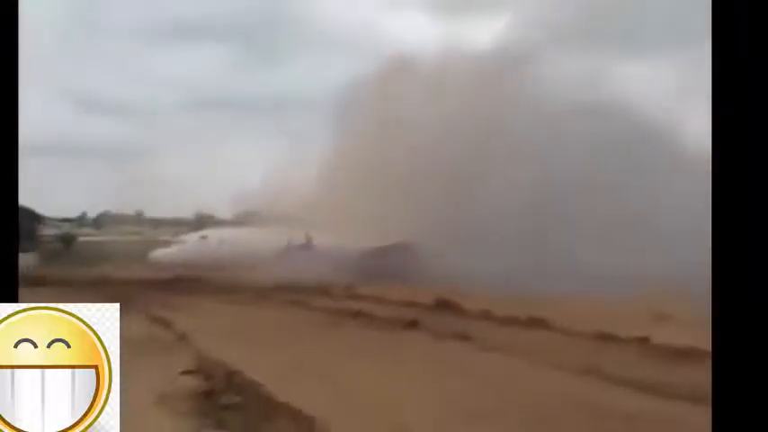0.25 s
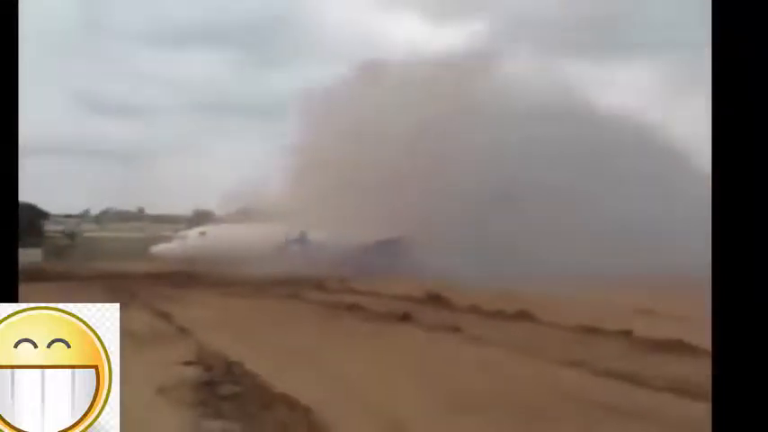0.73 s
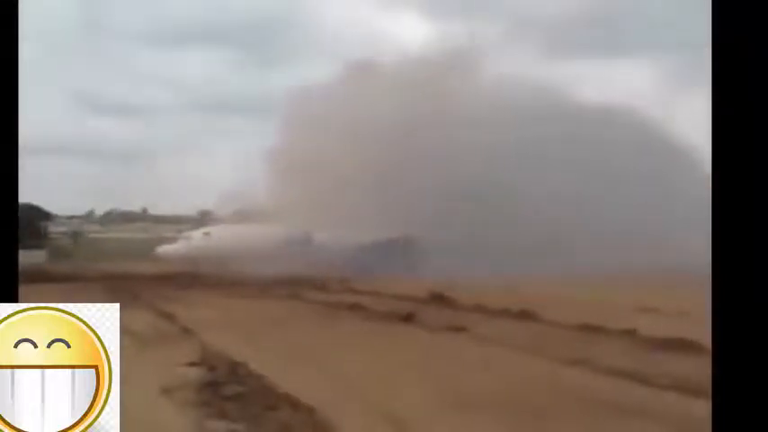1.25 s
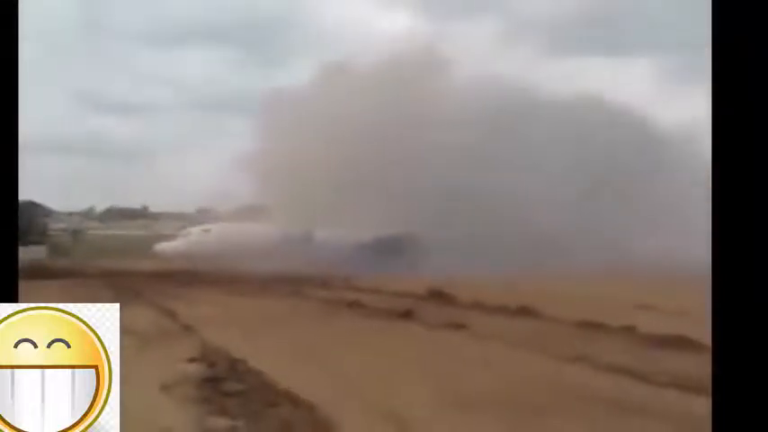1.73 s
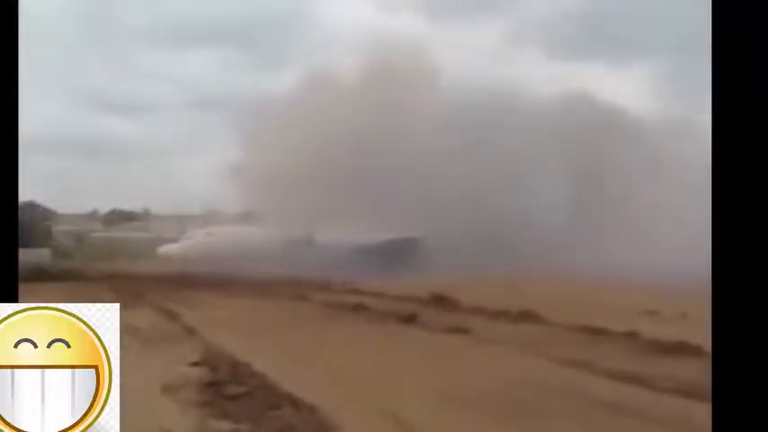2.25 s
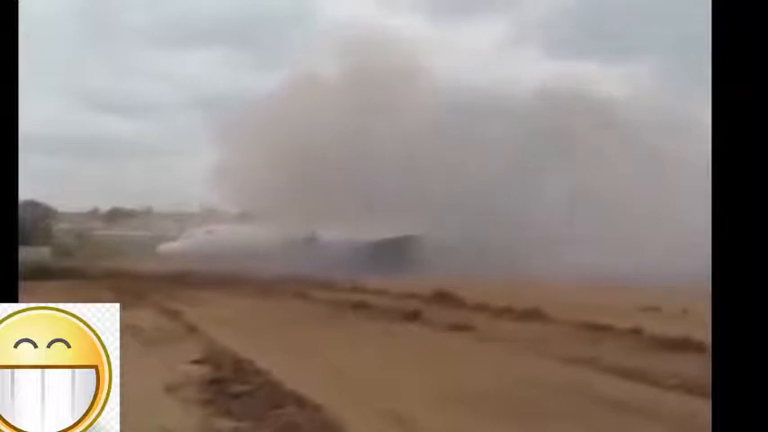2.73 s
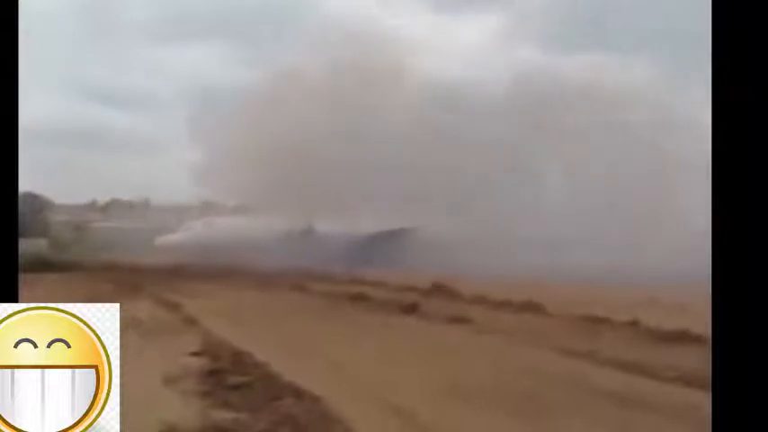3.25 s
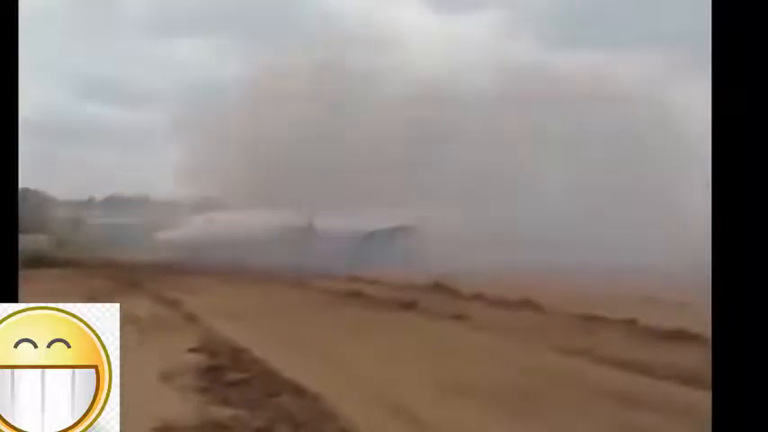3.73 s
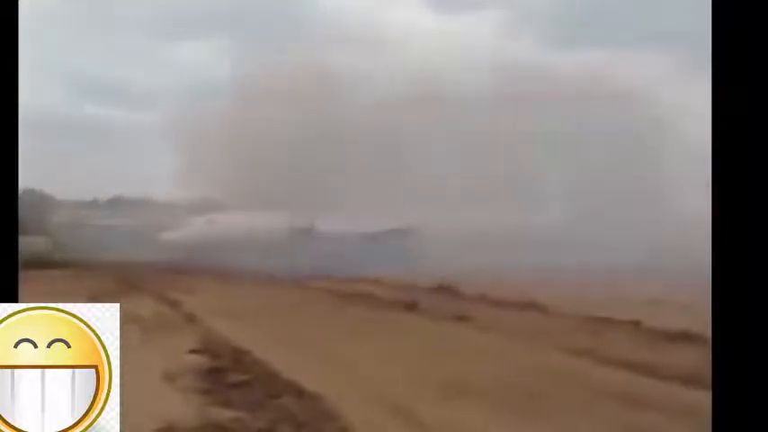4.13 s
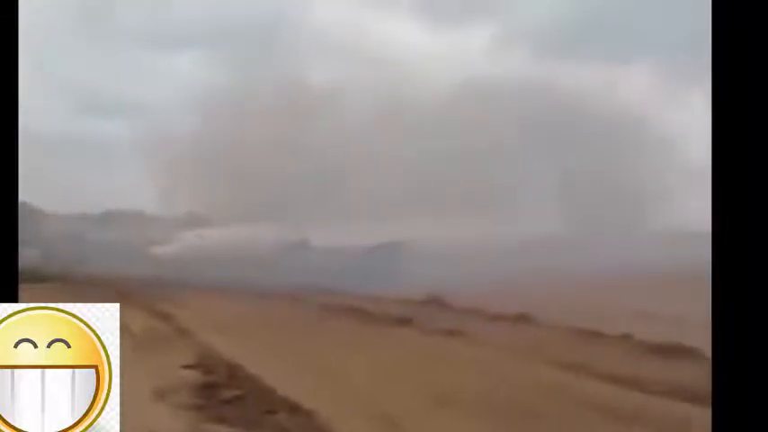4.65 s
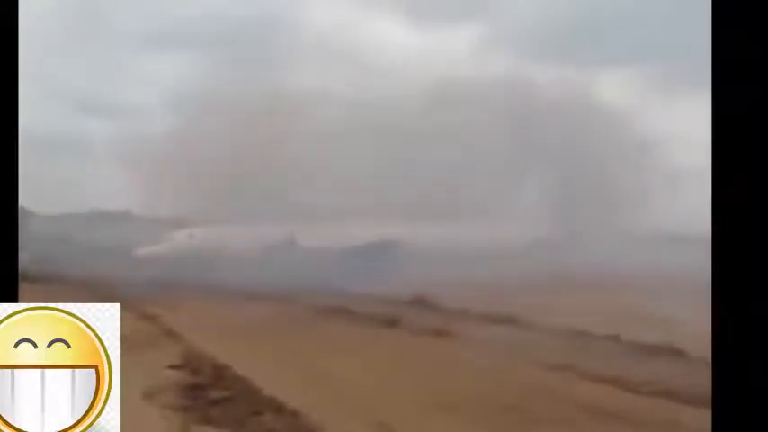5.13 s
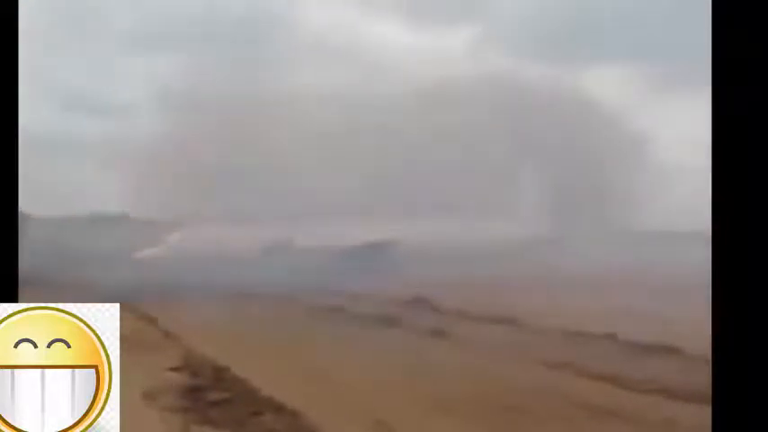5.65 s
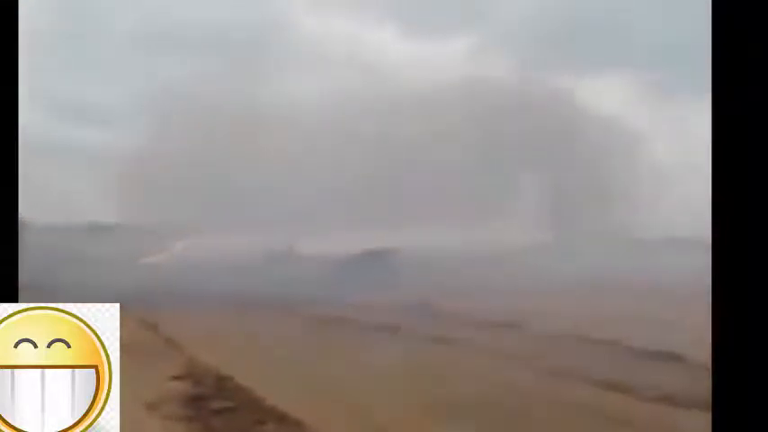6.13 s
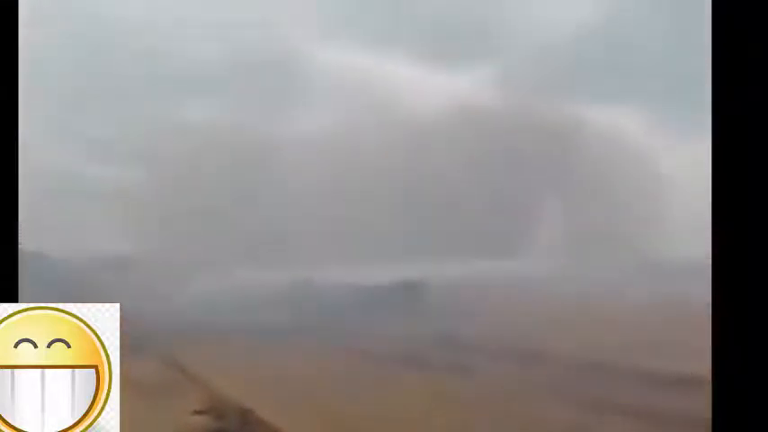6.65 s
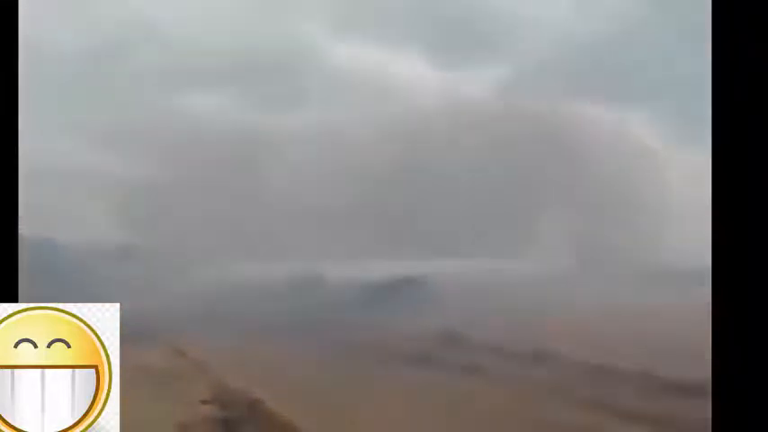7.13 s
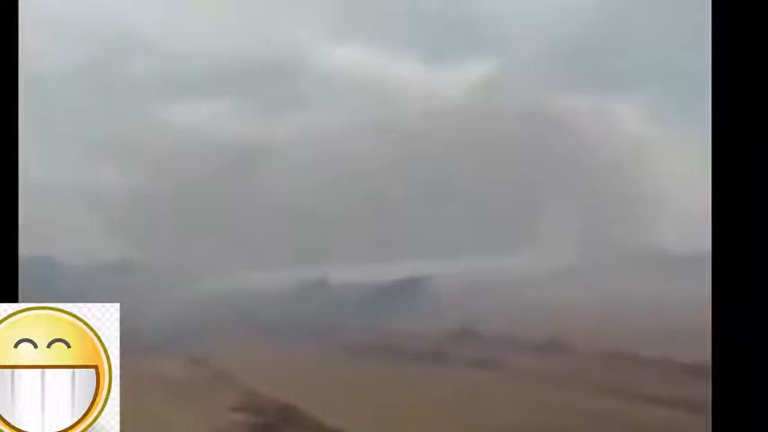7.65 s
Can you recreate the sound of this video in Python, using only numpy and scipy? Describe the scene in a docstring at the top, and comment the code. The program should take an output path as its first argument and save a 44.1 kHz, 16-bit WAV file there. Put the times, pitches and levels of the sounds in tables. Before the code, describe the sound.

Outdoors in an open dirt field, a jet airliner some way off winds its engines down. A broad, grainy rush runs throughout, swelling and dipping with the air, hissy at first and darker later. Thin, breathy turbine whines slide downward, while a low throbbing drone sinks and fades. Wind buffets the handheld microphone softly, most near the end.

```python
"""A jet airliner stands far off in an open field and its engines spool down.
Its broad rush is grainy noise in many bands, darker as the core slows; stirred air makes the upper rush swell.
Blade rows of the core whine in falling tones, with noise scattered around them.
Two unbalanced fan shafts drone low as sines that drift in and out of step, beside a slower shaft.
Wind buffets the microphone ports as low, uneven noise."""
import sys
import numpy as np
from scipy import signal
from scipy.fft import rfft, irfft, next_fast_len
from scipy.io import wavfile
from scipy.ndimage import uniform_filter1d

SR = 44100
rng = np.random.default_rng(int(sys.argv[2]) if len(sys.argv) > 2 else 0)


def materialize(psi):
    """Save the field psi as 16-bit PCM at rate SR to the path in sys.argv[1].

    A 1-D psi becomes a single channel; in a 2-D psi each row is a channel.
    """
    bounded = np.clip(np.atleast_2d(psi).T, -1, 1)
    quanta = np.round(bounded * 32767).astype(np.int16)
    wavfile.write(sys.argv[1], SR, quanta)


N = 347949


def undb(db):
    """Decibels to gain."""
    return 10 ** (np.asarray(db) / 20)


def curves(table):
    """Columns of a table after its time column, drawn as straight lines with one value per sample."""
    s, *columns = np.transpose(table)
    return [np.interp(np.arange(N) / SR, s, column) for column in columns]


def at(table, hz):
    """A table's value at a frequency, read on a log-frequency axis."""
    table_hz, values = np.array(table).T
    return np.interp(np.log(hz), np.log(table_hz), values)


def bump(x, middle, width):
    """A smooth hump of height 1 that has dropped to 0.37 half a width from its middle."""
    return np.exp(-(2 * (x - middle) / width) ** 2)


def walk(rate):
    """A smooth random wander: levels held 1 / rate s and averaged twice over that time; spread 1."""
    hold = int(SR / rate)
    steps = np.repeat(rng.standard_normal(N // hold + 1), hold)
    wander = uniform_filter1d(uniform_filter1d(steps, hold), hold)[:N]
    return wander / wander.std()


def spread(mid, side, pan_db=0):
    """Mid and side to left and right; pan_db raises left over right."""
    return np.array([(mid + side) * undb(pan_db / 2), (mid - side) * undb(-pan_db / 2)])


def core_hz():
    """The core coasts down: its tone falls quickly at first, then ever more slowly towards rest."""
    start_hz, rest_hz, coast_s = 3952, 1189, 5.462
    return rest_hz + (start_hz - rest_hz) * np.exp(-np.arange(N) / SR / coast_s)


def grainy(sound):
    """Random narrow patches of the spectrum swell and fade quickly, giving the rush a grainy texture."""
    patch_db, patch_hz, patch_s = 2.6, 90, .07  # depth; widths of the averaging in frequency and time
    hz, s, frames = signal.stft(sound, SR, nperseg=1024)
    field = rng.standard_normal(frames.shape[1:])  # one field for both ports
    field = uniform_filter1d(field, round(patch_hz / hz[1]), axis=0)
    field = uniform_filter1d(field, round(patch_s / s[1]), axis=1)
    depth_db = patch_db * np.clip(hz / 1500, 0, 1)[:, None]  # shallower below 1500 Hz
    return signal.istft(frames * undb(depth_db * field / field.std()), SR)[1][:, :N]


def rush(levels, pan_db):
    """Broad jet noise in overlapping bands a fifth of an octave apart; its colour darkens as the core slows."""
    # where each rush level applies: f/Hz
    rush_hz = [700, 2200, 3400, 4900, 7800]
    # colour of the rush while the core is fast: f/Hz, density/dB
    fast = [(25, -11), (100, -4.5), (170, -4.5), (280, -5.5), (480, -6.5), (800, -5.5), (1500, -9),
            (2700, -12.5), (3400, -7), (4500, -5.5), (6000, -12.5), (8000, -11.5), (9500, -12.5),
            (10800, -24)]
    # colour of the rush when the core is slow: f/Hz, density/dB
    idle = [(25, -1), (100, 2.5), (170, 4.5), (280, -3), (480, -4), (800, 2), (1500, -1), (2700, -2.5),
            (3400, -6), (4500, -14.5), (6000, -17), (8000, -14.5), (9500, -23), (10800, -49.5)]
    # steady dips and humps of the sound path and the microphone: f/Hz, width/Hz, gain/dB
    path = [(520, 160, -4), (1120, 170, -8), (1850, 250, -2.5), (2600, 600, 1.5), (3400, 750, 2.5)]
    # how wide the rush sounds: f/Hz, side minus mid/dB
    side_db = [(40, -21), (90, -24), (190, -21), (340, -22), (600, -24), (1060, -12), (1880, -11.5),
               (2600, -8), (3400, -11), (4400, -10), (5950, -6), (8000, -7.5), (10600, -16)]
    # how much of the left-right lean each pitch gets: f/Hz, share/1
    pan_share = [(1800, 0), (2600, 0.17), (3400, 1.3), (4000, -0.46), (5500, 0)]
    rumble_db = -32  # steady exhaust rumble below the roar
    # flicker from eddies: shared by all bands, each band's own, extra of its own in the treble
    shimmer_db, grain_db, high_grain_db = 1.2, 1.0, .1

    size = next_fast_len(N)
    noise_hz = np.arange(1, size // 2 + 2) * SR / size
    octave = np.log2(noise_hz)
    path_db = sum(db * bump(noise_hz, hz, width) for hz, width, db in path)
    spectra = rfft(rng.standard_normal((2, size))) * undb(path_db)

    slowed = np.clip((3500 - core_hz()) / (3500 - 1950), -.3, 1.1)  # 0 is fast, 1 is slow

    def colour(hz):
        return (1 - slowed) * at(fast, hz) + slowed * at(idle, hz)

    anchors = [150] + rush_hz
    # each level covers a stretch this many Hz wide, so the width comes off it to give a density
    widths_db = 10 * np.log10([200, 1200, 1400, 1100, 2000, 4500])
    lift = [db - width_db - colour(hz) for db, width_db, hz in zip([rumble_db] + levels, widths_db, anchors)]

    out, shimmer = 0, walk(17)
    for centre in np.arange(4.5, 13.6, .2):
        hz = 2 ** centre
        window = np.cos(np.pi / 2 * np.clip((octave - centre) * 5, -1, 1)) ** 2
        mid, side = irfft(spectra * window, size)[:, :N] * np.sqrt(SR / 2)  # to density per Hz
        # blend the lifts of the two nearest anchors
        shares = [np.interp(np.log(hz), np.log(anchors), one) for one in np.eye(len(anchors))]
        db = colour(hz) + sum(share * one for share, one in zip(shares, lift) if share)
        high = min(hz / 7900.0, 1)  # short waves feel the eddies most
        db = db + high * shimmer_db * shimmer + (grain_db + high_grain_db * high) * walk(16)
        out = out + undb(db) * spread(mid, undb(at(side_db, hz)) * side, pan_db * at(pan_share, hz))
    return grainy(out)


def tone(hz, db, flutter_db, smear):
    """A sine whose level and phase waver as the air along the path stirs."""
    phase = 2 * np.pi * np.cumsum(hz) / SR
    gain = np.sqrt(2) * undb(db + flutter_db * walk(16))
    return gain * np.sin(phase + smear * walk(25))


def band(hz, width_hz):
    """Noise in a band whose centre moves: slow noise shifted up to the moving pitch; rms 1."""
    low_pass = signal.butter(2, width_hz / 2, fs=SR, output="sos")
    slow = signal.sosfilt(low_pass, rng.standard_normal((2, N)))
    carrier = np.exp(2j * np.pi * np.cumsum(hz) / SR)
    noise = np.real(carrier * (slow[0] + 1j * slow[1]))
    return noise / noise.std()


def whine(pan_db):
    """Blade-passing and nearby tones of the core, each in a skirt scattered by turbulence; the turbine band."""
    # pitch of each blade row or sound beside it: name, multiple of the core tone/1
    row_multiples = {"first": .997, "second": 1.2375, "third": 1.5381, "fourth": 1.7975, "under first":
                     .955, "under second": 1.2155, "over second": 1.325, "low": .406, "high": 2.1,
                     "turbine": 3.29}
    # moments when a whistle or short hissing surge stands out of the rush: pitch name, middle t/s, length/s,
    # level/dB
    whistles = [("first", 0.09, 0.24, -33), ("second", 0.16, .4, -32.5), ("first", 0.69, 0.24, -34.5),
                ("second", 0.8, 0.3, -43), ("first", 1.33, 0.12, -36), ("under first", 1.4, .16, -36),
                ("first", 1.56, 0.3, -33.5), ("first", 1.82, .16, -35), ("over second", 2.14, .12, -34),
                ("second", 2.2, 0.12, -39), ("second", 2.62, 0.2, -39), ("first", 3.3, 0.3, -42),
                ("under second", 3.57, 0.3, -33.5), ("second", 4.35, .25, -40), ("low", 7.84, .16, -40),
                ("high", .15, .3, -39), ("turbine", 5.65, .2, -38), ("fourth", 5.65, .4, -43),
                ("third", 6.05, 0.3, -41), ("second", 6.55, 0.3, -41), ("third", 6.5, .3, -40),
                ("first", 6.5, 0.6, -42), ("fourth", 6.6, .15, -44), ("fourth", 7.0, 0.3, -37),
                ("fourth", 7.38, .3, -38), ("fourth", 7.75, 0.3, -39)]
    # broad humps of scattered sound around the first two rows: t/s, first level/dB, second level/dB
    humps = [(0, -42, -44), (.4, -37, -43), (.8, -33, -34), (1.2, -38, -45), (1.6, -39, -46),
             (2.1, -37, -33), (2.6, -35, -36), (2.85, -35, -39), (3.2, -33, -37), (3.4, -37, -34),
             (3.65, -31, -34), (3.9, -34, -38), (4.3, -42, -33), (4.55, -36, -39), (4.85, -41, -36),
             (5.4, -41, -37), (7.89, -43, -39)]
    # a high turbine tone scattered into a band: t/s, multiple of the core tone/1, level/dB
    turbine = [(0, 2.2, -37), (1, 2.3, -37), (2.5, 2.9, -90), (4, 3.25, -38), (4.5, 3.25, -41.5),
               (4.9, 3.25, -38), (5.25, 3.25, -39), (5.65, 3.27, -34), (6, 3.25, -38), (6.4, 3.25, -38.5),
               (7.89, 3.25, -42)]
    buried_db = -52  # level at each pitch between these moments
    flutter_db, smear, skirt_db, skirt_hz = 2.5, .5, -9, 120  # smear in radians; skirt relative to its tone

    hz, t = core_hz(), np.arange(N) / SR
    tones = 0
    for name, row in row_multiples.items():
        swells = sum(undb(db) * bump(t, s, length) for r, s, length, db in whistles if r == name)
        gain = undb(buried_db) + swells
        skirt = undb(skirt_db) * band(hz * row, skirt_hz)
        tones = tones + gain * (tone(hz * row, 0, flutter_db, smear) + skirt)
    for row, db in zip((1.0, 1.29), curves(humps)):  # hump centres over the core tone
        tones = tones + undb(db) * band(hz * row, 550)
    multiple, db = curves(turbine)
    turbine_mid = band(hz * multiple, 1130)
    turbine_side = undb(-11) * band(hz * multiple, 840)
    return spread(tones, 0, pan_db) + undb(db) * spread(turbine_mid, turbine_side)


def shafts():
    """Once-a-turn drone of the unbalanced shafts; the two fans throb as they fall in and out of step."""
    # two fan shafts: t/s, mean turns f/Hz, level in step/dB, second minus first fan/dB, second harmonic level/dB
    fan = [(0.0, 85.5, -15.5, -10, -29.5), (.39, 81.3, -22, -7, -33.5), (.65, 77.7, -24, -6, -39),
           (1.12, 70.1, -22, -9, -36), (1.6, 64.4, -24, -7, -38), (1.9, 61.1, -25, 0, -37),
           (2.2, 58.3, -26, 2, -38), (2.54, 55.54, -26, 3, -45), (2.94, 52.7, -30.5, 0, -43),
           (3.24, 50.7, -27, -3, -46), (3.79, 47, -33.5, -6, -48), (4.22, 44.7, -29.5, -4, -48),
           (4.58, 43.2, -31.5, -3, -50), (4.9, 42, -32.5, -2, -53), (5.3, 40.3, -36.5, -1, -50),
           (5.89, 38.9, -33.5, -1, -50), (6.27, 36.8, -36.5, -2, -50), (6.63, 34.9, -34, -2, -50),
           (6.98, 33.57, -36.5, -1, -50), (7.35, 33, -41, 0, -50), (7.68, 32.6, -36.5, -1, -51),
           (7.89, 32.3, -39, -1, -51)]
    # turns that the second fan has gained on the first, opposed at each half turn: t/s, lead/turns
    lead_table = [(0, -.2), (.39, .5), (.88, 1.5), (1.5, 2.5), (1.9, 3.5), (2.26, 4.5), (2.74, 5.5),
                  (3.08, 6.5), (4.01, 8.5), (4.76, 10.5), (6.07, 14.5), (6.8, 16.5), (7.2, 17.5),
                  (7.49, 18.5), (7.89, 19.7)]
    # a slower shaft, heard early: t/s, turns f/Hz, level/dB
    slow_shaft = [(0, 54.9, -37), (.6, 52.3, -36), (1.3, 48.04, -40), (1.8, 45.13, -60), (2.4, 42, -62)]

    hz, db, second_fan_db, harmonic_db = curves(fan)
    turns, lead, second_fan = np.cumsum(hz) / SR, curves(lead_table)[0], undb(second_fan_db)
    pair = np.sin(2 * np.pi * (turns - lead / 2)) + second_fan * np.sin(2 * np.pi * (turns + lead / 2))
    slow_hz, slow_db = curves(slow_shaft)
    overtones = tone(2 * hz, harmonic_db, 1.5, .2)
    # the third harmonic shows briefly, around 5.3 s
    swell = bump(np.arange(N) / SR, 5.3, .8)
    overtones = overtones + swell * tone(3 * hz, -39, 1.5, .2)
    drone = np.sqrt(2) * undb(db) * pair / (1 + second_fan) + overtones + tone(slow_hz, slow_db, 1.3, .2)
    return spread(drone, 1.5 * np.gradient(drone))  # the slope as side: left hears it about 3 samples early


def wind():
    """Low rumble of gusts, pushing the two ports mostly against each other."""
    # wind on the microphone ports, before buffeting and sharing out: t/s, level/dB
    gusts = [(0, -45), (.4, -70), (2, -57), (2.9, -49), (3.35, -40), (3.7, -53), (4.9, -54), (5.4, -47),
             (6.3, -50), (6.8, -44.5), (7.1, -34.5), (7.89, -41.5)]
    top_hz, buffet_db = 140, 2  # top of the rumble; spread of the buffeting
    mid_db, left_db = -2, 3  # trim of the part common to both ports; left over right
    rumble_filter = signal.butter(2, [20, top_hz], "band", fs=SR, output="sos")
    rumble = signal.sosfilt(rumble_filter, rng.standard_normal((2, N)))
    buffeting = buffet_db * np.array([walk(6.8), walk(6.7)])
    mid, side = rumble / rumble.std() * undb(curves(gusts)[0] + buffeting)
    return spread(undb(mid_db) * mid, side, left_db)


def scene():
    """Rush, whine and shaft drone, nearly straight ahead, and wind; moving air sways the rush and whine."""
    # rush in average air: t/s, exhaust roar level/dB, low rush level/dB, main rush level/dB, hiss level/dB,
    # top hiss level/dB, left minus right/dB
    average_rush = [(0, -34, -30.5, -29.5, -28.5, -34, 0), (1, -34.5, -31.5, -31, -32, -32.5, -3),
                    (2, -34.5, -32.5, -31, -32.5, -32.5, -2), (2.8, -33, -30, -30, -30.5, -31.5, -2),
                    (3.5, -32.5, -28, -27, -30.5, -28.5, -1.5), (4.3, -34, -29.5, -28, -32.5, -36.5, -2),
                    (5.1, -34, -31.5, -32, -31.5, -38, -2), (5.8, -30, -30, -27.5, -32.5, -38, -3),
                    (6.5, -30, -28, -32.5, -31.5, -40.5, -3), (7.2, -30.5, -26, -29, -31, -35, -6.5),
                    (7.89, -36, -32, -33.5, -38, -45, -7)]
    # upper rush as the air carries it, used as swings about the mean: t/s, level/dB, treble minus level/dB
    air = [(0.0, -24, -3), (0.04, -27.5, 1.5), (0.17, -26.5, -3.5), (0.24, -29, 0), (0.74, -24.5, -6.5),
           (0.99, -26, -4.5), (1.84, -23, -4.5), (2.02, -27, -6), (2.11, -23, -4.5), (2.42, -28.5, -1.5),
           (2.64, -22.5, -5.5), (2.72, -28, -4.5), (2.83, -28, -7.5), (3.01, -27.5, -3.5),
           (3.05, -25.5, -7), (3.14, -30.5, -3), (3.16, -26.5, -11), (3.34, -27.5, -3), (3.42, -24.5, -7),
           (3.66, -24.5, -9), (3.78, -29.5, -4.5), (3.87, -28.5, -1), (4.02, -25, -3.5), (4.11, -30.5, -1),
           (4.22, -22, -6), (4.33, -23, -5.5), (4.5, -25, -4.5), (4.7, -28.5, -4.5), (4.79, -20.5, -7),
           (4.9, -22, -6), (5.01, -30.5, 0.5), (5.36, -29.5, -7), (5.51, -25.5, -2), (5.73, -28, 1.5),
           (5.84, -32, -0.5), (6.0, -22, -1.5), (6.13, -25.5, -11.5), (6.2, -22, -11), (6.57, -23.5, -3.5),
           (6.72, -24, -19), (7.03, -22.5, -4.5), (7.1, -26.5, -13), (7.23, -24.5, -4), (7.49, -26, -10.5),
           (7.56, -32, -1.5), (7.65, -27, 2), (7.87, -22.5, -10), (7.89, -23.5, 3)]
    # how far roar, low rush, main rush, hiss and top hiss follow the air's level: depth/dB per dB
    air_depth = [0.18, 0.25, 0.95, 0.94, 0.91]
    # and how far the same five follow its treble: depth/dB per dB
    treble_depth = [0.091, 0, 0.072, 0.46, 0.88]
    *levels, pan_db = curves(average_rush)
    air_db, treble_db = (column - column.mean() for column in curves(air))
    levels = [db + a * air_db + b * treble_db for db, a, b in zip(levels, air_depth, treble_depth)]
    return rush(levels, pan_db) + whine(pan_db) * undb(0.65 * air_db) + shafts() + wind()


def record(dry):
    """The recorder steeply cuts the top, above 10850 Hz."""
    return signal.sosfilt(signal.ellip(14, .2, 90, 10850, fs=SR, output="sos"), dry)


dry = scene()
out = record(dry)
materialize(out)
```